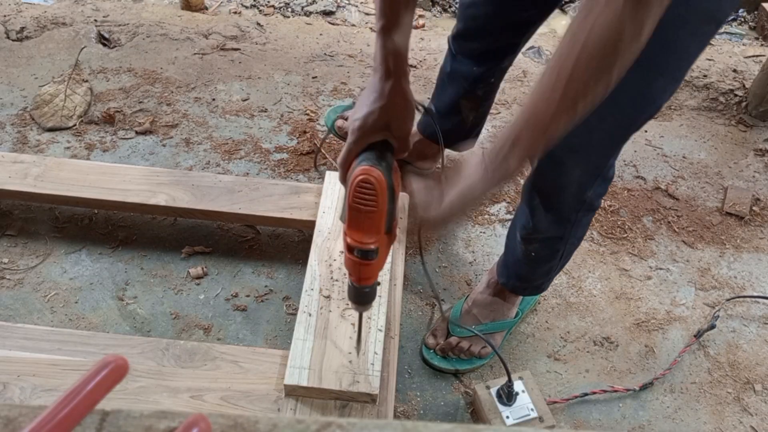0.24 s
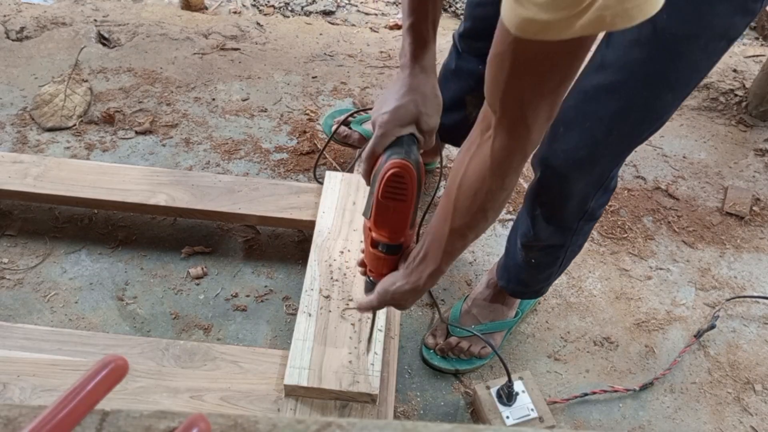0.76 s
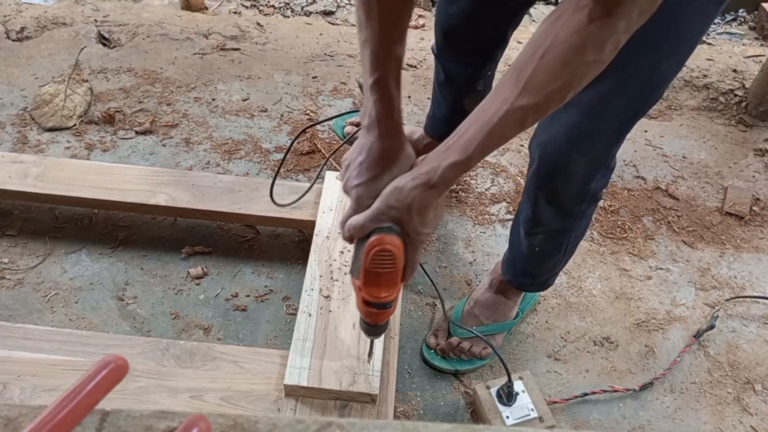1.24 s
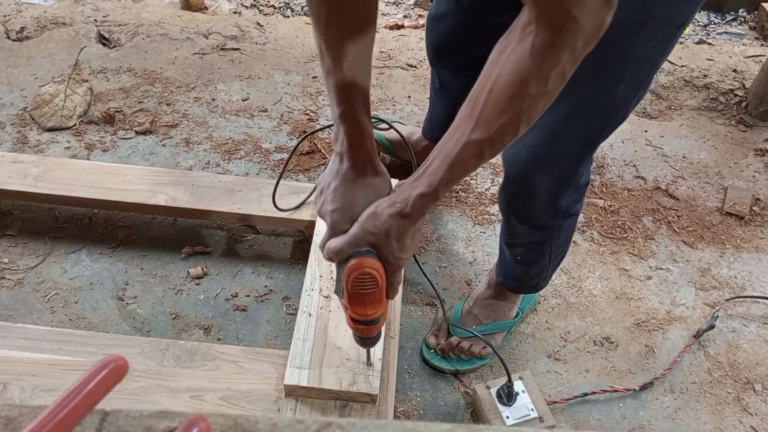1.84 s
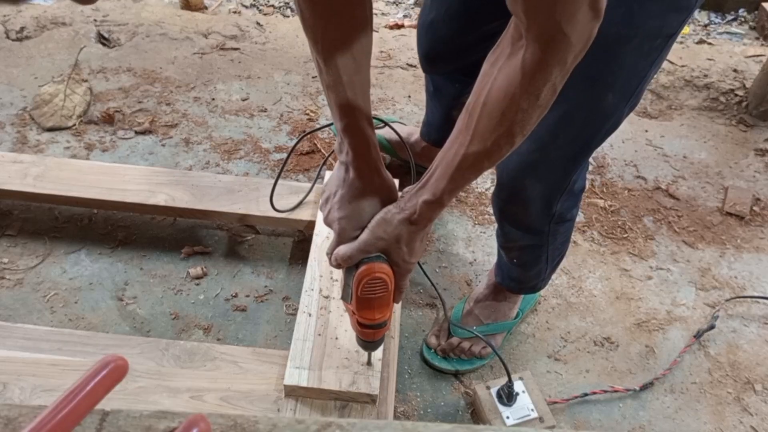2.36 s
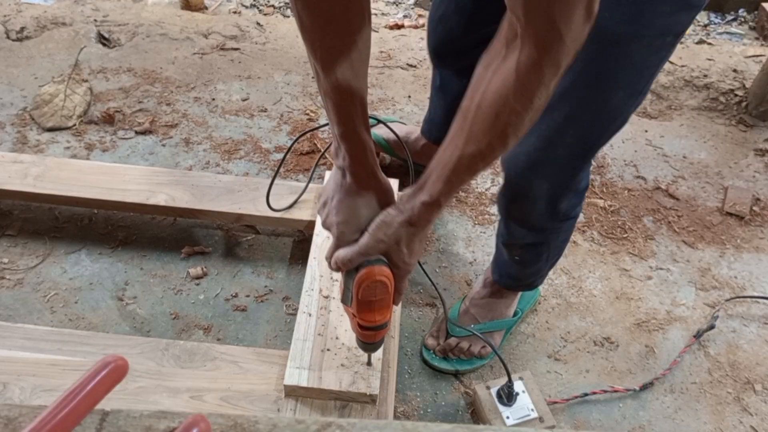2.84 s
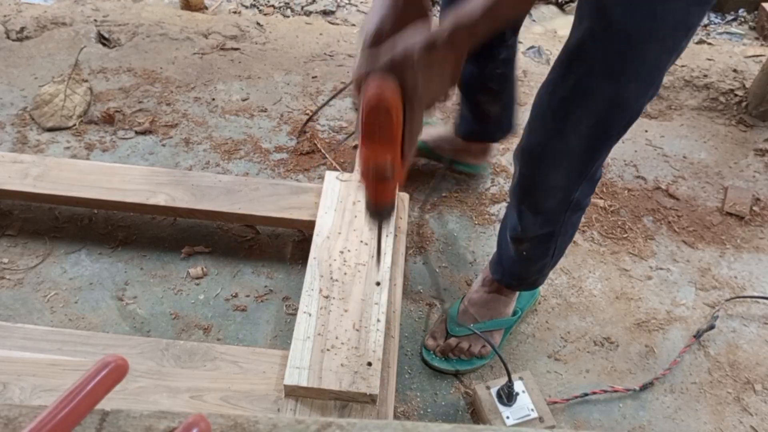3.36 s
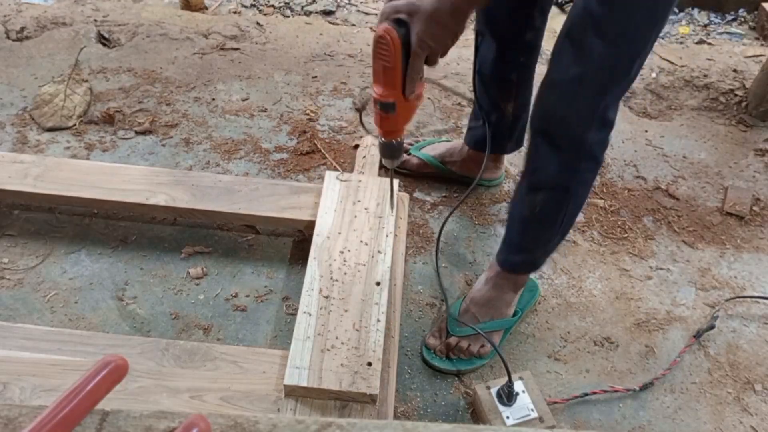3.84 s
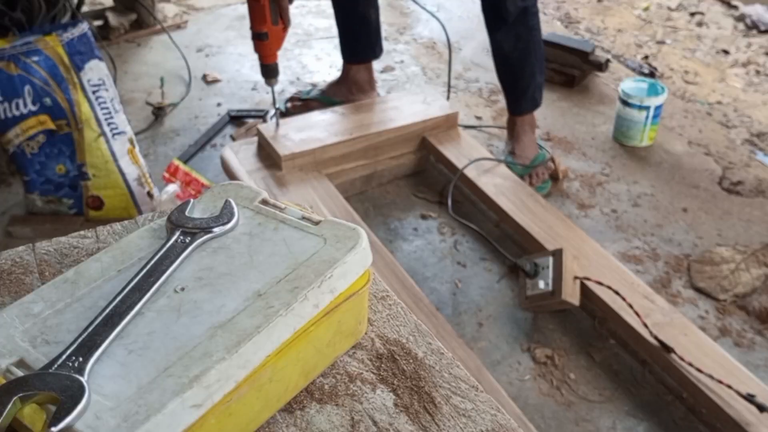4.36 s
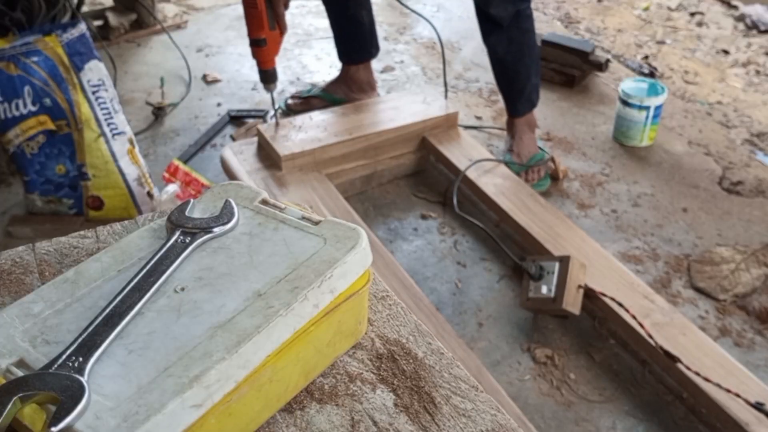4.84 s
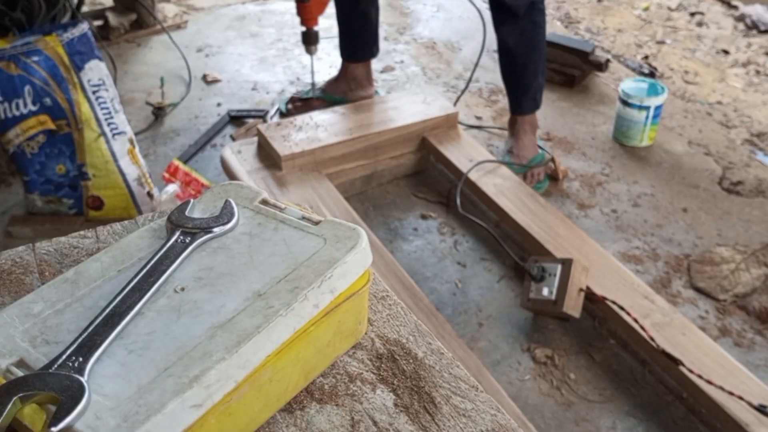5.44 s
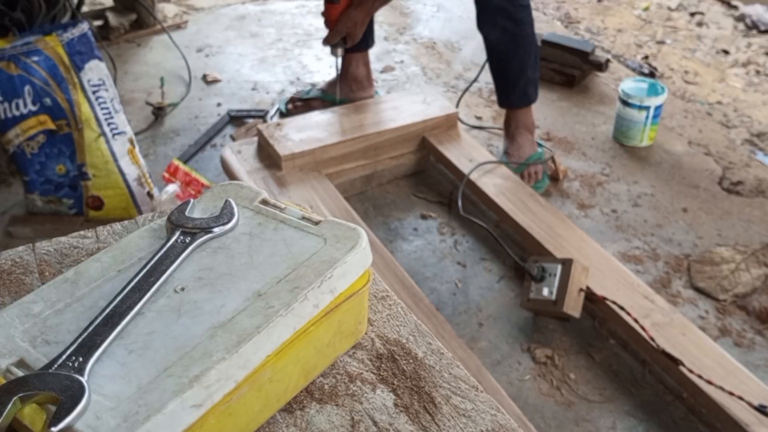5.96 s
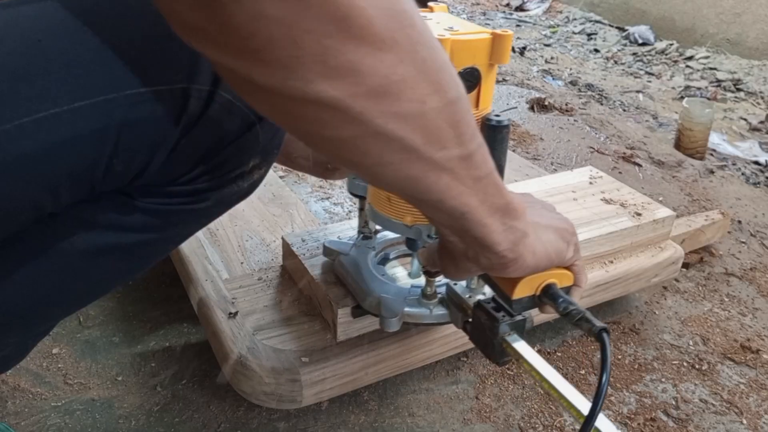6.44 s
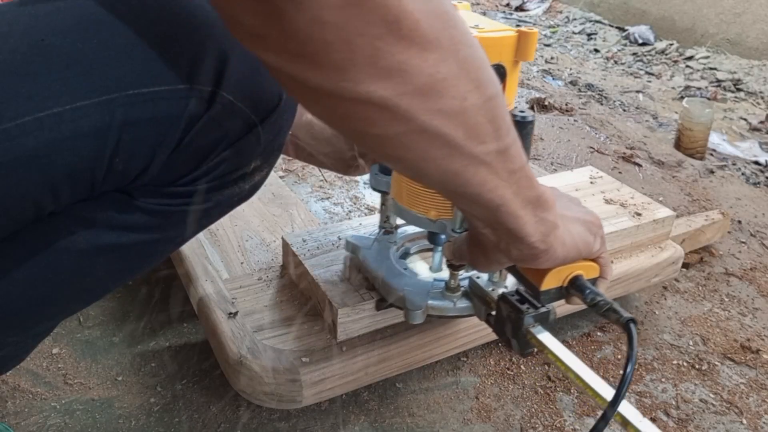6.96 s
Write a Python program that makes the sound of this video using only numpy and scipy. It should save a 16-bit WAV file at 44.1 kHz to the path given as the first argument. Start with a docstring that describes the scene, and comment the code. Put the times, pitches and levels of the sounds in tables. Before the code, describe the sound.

Close, nearly dry workshop sounds over faint yard hiss: a freewheeling drill winding down, a quiet gap, then a sudden gear knock and grinding whine as the bit sinks into wood, its pitch drooping under load before it spins free. Another clicky start and quicker bore follow from a slightly different position. Abruptly, a far louder plunge router takes over, a dense bright roar with low hum and thin high whistles to the end.

```python
"""A mains hand drill in an open workshop, then a plunge router: four short scenes that follow abruptly.
The drill coasts down; twice it starts, bores into a board, races as the bit comes free and coasts again.
Its whine, bearing tones, commutator whistle and noise-like rush all follow one armature speed.
Last, the router cuts a slot: shaft harmonics and fan whistles over noise modulated by the cutter."""
import sys
import numpy as np
from scipy import signal
from scipy.fft import rfft, irfft
from scipy.io import wavfile
from scipy.ndimage import uniform_filter1d

SR = 44100
rng = np.random.default_rng(int(sys.argv[2]) if len(sys.argv) > 2 else 0)


def generate_wav(signal):
    """Clip the signal to [-1, 1] and save it as 16-bit WAV at the path in sys.argv[1]."""
    frames = np.transpose(np.atleast_2d(signal))
    scaled = np.clip(frames, -1, 1) * 32767
    pcm = np.round(scaled).astype(np.int16)
    wavfile.write(sys.argv[1], SR, pcm)


N = 317520
TIME = np.arange(N) / SR
HZ = np.maximum(np.arange(N // 2 + 1) * SR / N, 1)

# where one scene gives way to the next (s); the level dips between the second and third
FIRST_END, SECOND_END, THIRD_START, ROUTER_START = 1.039, 3.951, 3.973, 6.183
DROPOUT_DB = -27
CUTOFF_HZ = 15780

# yard hiss: frequency_hz, density_db
YARD_SPECTRUM = [(35, -66), (60, -44), (103, -35), (152, -35), (255, -28.5), (456, -21), (632, -0.5),
                 (799, 0.5), (1370, -3.5), (2230, -2.5), (3810, -8), (15800, -26.5)]
YARD_DB = -63.5

# freewheeling: start_s, top_turns_per_s, decay_rate_per_s, rush_db, dying_turns_per_s
COASTS = [(0, 630, 0.47, -43, 360), (3.351, 672, 0.62, -42.5, 470), (5.349, 684, 1.44, -42, 400)]
# the slow fan's rush drops by this much over this loss of speed
DYING_DB, DYING_TURNS_PER_S = 7.5, 92.5
# trigger pulls: start_s, rise_s, rush_db, fading_db_per_s as the bit sinks, knock_db, knock_t60_s
STARTS = [(1.495, 0.084, -41, 2, -38, .36), (4.4, .058, -41, 4, -39, 0.19)]
# armature speed in the wood, sagging as the hand leans harder: time_s, speed_turns_per_s
FIRST_HOLE_SPEED = [(1.62, 410), (1.638, 420), (1.702, 470), (1.754, 537), (1.868, 563), (2.082, 561),
                    (2.256, 524), (2.474, 499.4), (2.592, 474), (2.71, 457.1), (3.04, 467.2)]
SECOND_HOLE_SPEED = [(4.48, 446.5), (4.52, 532), (4.56, 572.1), (4.61, 594.5), (4.65, 597.7),
                     (4.868, 563.3), (5.058, 530.6), (5.12, 488), (5.16, 501.1)]
# the inrush of current makes the brushes spark louder at each start
INRUSH_DB, INRUSH_S = 3, 0.049
# load of the bit (share 0-1), time it takes to come free, exponent of the race to top speed
BORING_LOAD, FREEING_S, RACE_EASE = 0.9, 0.059, 1.5
# the current dies down shortly before top speed
CURRENT_FALL_S, CURRENT_LEAD_S = 0.14, 0.042

# rush while boring, coasting and turning slowly: frequency_hz, density_db
BORING_SPECTRUM = [(30, -44), (70, -25), (110, -15.5), (200, -18.5), (330, -12), (520, -4.5), (800, 0.5),
                   (1200, -0.5), (2400, 3.5), (4300, 3), (6800, -1.5), (8200, -18.5), (13500, -26),
                   (15800, -29)]
COASTING_SPECTRUM = [(40, -58), (120, -64), (200, -33.5), (320, -15.5), (520, -10.5), (800, -4.5),
                     (1250, -2), (1800, -2.5), (2600, -2), (4200, -2), (5500, -5.5), (6900, -5),
                     (8000, -17.5), (11000, -25), (13600, -29), (15800, -28)]
IDLING_SPECTRUM = [(59, -76), (100, -63), (219, -43), (342, -21), (413, -25), (500, -18), (618, -24),
                   (849, -7.5), (1750, -10), (2110, -6), (5030, -18), (6920, -18), (15800, -33)]
# resonances of the drill's housing: centre_hz, width_hz, height_db
HOUSING_MODES = [(768, 46, 3.5), (1440, 990, 1.57), (2230, 260, 3.5), (2880, 220, 2), (3730, 170, 2),
                 (6040, 140, 2.5), (6660, 130, 2), (9040, 540, 2), (13400, 700, 3.5)]
# treble against the rush at the usual speed, and its gain per tenfold speed
USUAL_TURNS_PER_S = 550
BORING_TREBLE_DB, COASTING_TREBLE_DB, TREBLE_PER_DECADE_DB = -11.5, -6.5, 13
# second hole heard from another spot: frequency_hz, gain_db
OTHER_SPOT = [(60, -12), (130, 1.5), (250, -4), (500, -2), (1000, -0.5), (3500, -1.5), (5200, -2.5),
              (9000, -1), (11500, -2.5), (15800, -7)]
# vents that face that spot: centre_hz, width_hz, height_db
VENT_MODES = [(3380, 120, 2), (6200, 270, 1.2), (6820, 260, 3.2), (13400, 720, 3.3)]

# ball bearing tones before the housing colours them: ball_pass_multiple, level_db against the rush
BEARING_TONES = [(1, -12), (2, -11.5), (3, -13), (4, -17), (5, -29), (6, -28), (7, -25)]
BALLS_PER_TURN = 2.4
# commutator whistle against the rush at the usual speed, and its gain per tenfold speed
WHISTLE_DB, WHISTLE_PER_DECADE_DB = -20, 35

# scuffs and clicks: start_s, level_db, centre_hz, t60_s
HANDLING = [(1.115, -59, 1200, 0.2), (1.446, -53, 2920, 0.19), (1.448, -55, 750, 0.68),
            (4.088, -49.5, 3380, 0.16), (4.205, -55, 2500, .03), (4.395, -47, 2596, 0.04),
            (4.408, -41, 801, 0.027), (4.417, -37, 1500, 0.031)]
# knock of the gears: frequency_hz, density_db
KNOCK_SPECTRUM = [(50, -38), (130, -18), (300, -5.5), (560, -1), (780, 9), (960, -3), (1200, -3),
                  (2500, -2), (8000, -45)]
KNOCK_PEAK = 0.84  # peak position, as a share of the rise

# low whine orders away from any resonance: frequency_hz, gain_db
WHINE_GAIN = [(400, -54.5), (500, -53.5), (1100, -52.5), (1700, -54), (2400, -53)]
# workpiece resonances that the orders sweep through: centre_hz, width_hz, height_db
FIRST_PIECE_MODES = [(463.3, 16, 9.5), (911, 156, 11), (1400, 66, 6), (1595, 70, 10), (1680, 53, 5.5),
                     (1846, 21, 14), (2160, 130, 12)]
SECOND_PIECE_MODES = [(549.5, 40.3, 4.4), (984, 157, 12.8), (1149, 103, 9.5), (1624, 86, 8.4),
                      (1767, 46, 8), (2000, 50, 12.7), (2295, 240, 9.3)]
# upper whine orders before the housing colours them: order, level_db against the rush
OVERTONES = [(5, -12.5), (6, -15), (7, -12.5), (8, -13), (9, -13), (10, -14), (11, -12.5), (12, -13.5),
             (13, -12.5), (14, -16), (15, -13.5), (16, -17)]
SECOND_OVERTONES_DB = 2.0  # the upper orders carry better in the second hole
# onset of the whine; gain left once the bit is free
WHINE_ATTACK_S, FREE_WHINE_DB = 0.091, -12.5
# the armature rattles in its play until up to speed: phase jitter (turns), settling speed
SPIN_UP_JITTER, SETTLED_TURNS_PER_S = 0.06, 450

# router shaft sagging in the cut: time_s, speed_turns_per_s
ROUTER_SPEED = [(6.19, 336.3), (6.5, 331), (6.7, 328.9), (6.9, 328.2), (7.1, 326.6), (7.2, 324.3)]
# its hum: time_s, second_harmonic_db, third_harmonic_db
HUM_LEVELS = [(6.2, -37, -42), (6.234, -35, -39), (6.324, -42, -48), (6.418, -37, -44), (6.456, -43, -43),
              (6.934, -47.5, -41.5), (7.18, -35.5, -34.5)]
ROUTER_FIRST_DB, ROUTER_FOURTH_DB, HUM_WAVER_DB = -41.5, -41, 1.2
# router fan and commutator tones: order, level_db
ROUTER_TONES = [(15.8, -47), (16, -43.5), (32, -56), (37, -43.5)]
# the router's cut: time_s, level_db, treble_db against the level
CUT_LEVELS = [(6.195, -27.5, -9), (6.203, -28.5, -8), (6.301, -27.5, -8.5), (6.617, -30, -8),
              (6.731, -27.5, -9), (6.783, -30.5, -7.5), (7.135, -29, -7.5), (7.19, -30.5, -7.5)]
# roar of the cutter: frequency_hz, density_db
CUTTING_SPECTRUM = [(30, -54), (60, -36), (110, -20), (200, -18), (400, -11), (700, -3.5), (1100, -5.5),
                    (1650, -1), (2400, -3), (3100, 0.5), (4500, -7.5), (6500, -7.5), (8000, -11),
                    (9500, -9), (11500, -16.5), (15800, -22.5)]
# resonances of the router and of the board: centre_hz, width_hz, height_db
ROUTER_MODES = [(1540, 30, 4), (1825, 35, 4), (2008, 35, 4), (2288, 35, 4), (2614, 25, 3), (2707, 40, 5),
                (3009, 35, 4), (3133, 45, 4), (3741, 25, 6), (4130, 200, 3), (5220, 140, 4), (6400, 250, 3),
                (10600, 200, 3), (13300, 700, 3)]
BOARD_MODES = [(230, 10, 10.5), (480, 12, 5.1), (565, 7.2, 6.5), (720, 25, 2.7), (766, 23, 5.1),
               (892, 120, 5.3)]
# stereo spread of the roar: frequency_hz, side_gain_db
SIDE_GAIN = [(40, -45), (400, -67), (3500, -70), (4700, -38), (5600, -20), (8000, -15), (10500, -11),
             (13000, -5), (15800, -4)]


def from_db(db):
    """Logarithmic level: decibels to amplitude gain."""
    return 10 ** (np.asarray(db) / 20)


def rms_one(x):
    """Normalization to unit rms."""
    return x / np.sqrt(np.mean(x ** 2) + 1e-20)


def in_time(rows):
    """Linear interpolation: each column of a curve at every sample."""
    s, *columns = np.transpose(rows)
    return [np.interp(TIME, s, c) for c in columns]


def between(start, end, fade=0.002):
    """Gating: 1 from start to end, with short ramps."""
    return np.clip((TIME - start) / fade, 0, 1) * np.clip((end - TIME) / fade, 0, 1)


def ramp(start, length):
    """Linear rise from 0 at start to 1 after length seconds."""
    return np.clip((TIME - start) / length, 0, 1)


def colour(points, resonances=()):
    """Resonance: a broad spectrum with bell-shaped peaks added in decibels."""
    hz, db = np.transpose(points)
    db = np.interp(np.log(HZ), np.log(hz), db)
    for centre, width, height in resonances:
        db = db + height / (1 + (2 * (HZ - centre) / width) ** 2)
    return from_db(db)


def filtered(x, gain):
    """Linear filtering: each frequency is scaled by its gain."""
    return irfft(rfft(x) * gain, N)


def noise(gain):
    """Random excitation: noise of the given colour, rms 1."""
    return rms_one(filtered(rng.standard_normal(N), gain))


def drift(rate):
    """Random modulation: low-passed noise up to about rate in Hz, rms 1."""
    return noise(1 / (1 + (HZ / rate) ** 2))


def rush(gain, level_db, treble_db):
    """Broadband turbulence: noise whose presence band and treble each follow a level."""
    band = (HZ > 2500) & (HZ < 7500)
    presence = np.sqrt(np.sum(gain[band] ** 2) / np.sum(gain ** 2))
    upper = 1 / (1 + (7800 / HZ) ** 24)
    body = noise(gain * np.sqrt(1 - upper)) / presence
    treble = noise(gain * np.sqrt(upper))
    return from_db(level_db) * (body + from_db(treble_db) * treble)


def tone(turns, order):
    """Periodic excitation: a line at a multiple of the shaft rate, rms 1."""
    return np.sqrt(2) * np.sin(2 * np.pi * (order * turns + rng.random()))


def reflections(x, wet_db, t60):
    """Reverberation: floor, boards and walls scatter a short decaying tail."""
    t = TIME[:SR // 3]
    tail = rng.standard_normal(len(t)) * from_db(-60 * t / t60) * (t > 0.003)
    tail = tail / np.linalg.norm(tail)
    wet = from_db(wet_db)
    return (x + wet * signal.fftconvolve(x, tail)[:N]) / np.sqrt(1 + wet ** 2)


def yard_hiss():
    """Stationary background: faint coloured noise with a slowly wandering level."""
    return from_db(YARD_DB + 0.59 * drift(5.4)) * noise(colour(YARD_SPECTRUM))


def run_down(coast):
    """Exponential decay: friction slows the shaft in proportion to its speed."""
    start, top, rate = coast[:3]
    return top * np.exp(-rate * np.maximum(TIME - start, 0))


def coasting_rush(coast, speed):
    """Fan noise of a freewheeling rotor, in dB: steady until it turns too slowly."""
    *_, db, dying_speed = coast
    return db - DYING_DB * np.clip((dying_speed - speed) / DYING_TURNS_PER_S, 0, 1)


def one_run(start, hole, coast):
    """Drive against load: spin up, bore, race free, coast; gives speed, power, load and rush in dB."""
    s, rise, db, fading = start[:4]
    free, free_speed = hole[-1]
    let_go, top = coast[:2]
    bore, = in_time([(s, 30), *hole])
    race = (top - free_speed) * (1 - (1 - ramp(free, let_go - free)) ** RACE_EASE)
    speed = np.where(TIME < let_go, bore + race, run_down(coast))
    power = 1 - ramp(let_go - CURRENT_LEAD_S - CURRENT_FALL_S, CURRENT_FALL_S)
    load = BORING_LOAD * (1 - ramp(free, FREEING_S))
    age = np.maximum(TIME - s - rise, 0)
    inrush_db = INRUSH_DB * np.exp(-age / INRUSH_S)
    rise_db = 26 * np.log10(np.maximum(ramp(s, rise), 0.12))
    driven_db = db - fading * age + inrush_db + rise_db
    rush_db = power * driven_db + (1 - power) * coasting_rush(coast, speed)
    return np.array([speed, power, load, rush_db])


def motor():
    """Rotor dynamics: the drill first coasts; each pull of the trigger belongs to a new run."""
    speed = run_down(COASTS[0])
    state = np.array([speed, np.zeros(N), np.zeros(N), coasting_rush(COASTS[0], speed)])
    holes = (FIRST_HOLE_SPEED, SECOND_HOLE_SPEED)
    for scene_start, start, hole, coast in zip((FIRST_END, THIRD_START), STARTS, holes, COASTS[1:]):
        state = np.where(TIME > scene_start, one_run(start, hole, coast), state)
    return state


def coasting_noise(speed, rush_db, treble_db):
    """Fan turbulence that darkens with falling speed, modulated by rattling unloaded gears."""
    slow = np.clip((360 - speed) / 50, 0, 1)
    fast_fan = rush(colour(COASTING_SPECTRUM, HOUSING_MODES), rush_db - 1, treble_db)
    slow_fan = rush(colour(IDLING_SPECTRUM), rush_db - 3, treble_db)
    fan = np.sqrt(1 - slow) * fast_fan + np.sqrt(slow) * slow_fan
    # the gears' flutter grows as they slow
    flutter = 0.021 + 0.045 * np.clip((520 - speed) / 80, 0, 1)
    return fan * from_db(0.76 * drift(70)) * (1 + flutter * tone(TIME + 0.0037 * drift(4), 25))


def bearing(turns, speed, load, power):
    """Ball-pass excitation: balls skid more once the armature coasts; the housing radiates the ticking."""
    skid = 0.035 * drift(22) + 0.14 * (1 - power) * np.clip((speed - 300) / 200, 0, 1) * drift(20)
    ticking_db = 4 * np.clip((500 - speed) / 100, 0, 1)  # slow balls tick more sharply
    free = 0
    for k, db in BEARING_TONES:
        slip = (0.12 + 0.11 * (1 - power)) * drift(32) / k
        level_db = db + ticking_db * np.clip(k - 2, -0.5, 1) + 3.95 * drift(13)
        free = free + from_db(level_db) * tone(BALLS_PER_TURN * turns + skid + slip, round(k))
    loaded = from_db(-11.5) * tone(turns + skid, 2.41) + from_db(-26.0) * tone(turns + skid, 3.41)
    ticking = (1 - load) * from_db(5.9 * power) * free + load * loaded
    return filtered(ticking, colour(COASTING_SPECTRUM, HOUSING_MODES))


def commutator_whistle(turns, speed, power):
    """Segment-rate excitation: a line 24 times a turn as the power fades, louder at speed."""
    speed_db = WHISTLE_PER_DECADE_DB * np.log10(speed / USUAL_TURNS_PER_S)
    level = from_db(WHISTLE_DB + speed_db + 3.5 * drift(12))
    return (1 - power) * level * tone(turns + 0.011 * drift(60), 24)


def handling():
    """Impact and friction: band-passed bursts decay as scuffs and clicks of the bit and trigger."""
    out = 0
    for s, db, hz, t60 in HANDLING:
        band = 1 / (1 + (HZ / hz - hz / HZ) ** 2)
        decay_db = db - 60 * np.maximum(TIME - s, 0) / t60
        out = out + noise(band) * between(s, s + 1) * from_db(decay_db)
    return out


def gear_knock():
    """Backlash: a burst of noise as the gears take up their play when the motor kicks in."""
    swell = 0
    for s, rise, _, _, db, t60 in STARTS:
        to_peak = KNOCK_PEAK * rise
        decay_db = db - 60 * np.maximum(TIME - s - to_peak, 0) / t60
        swell = swell + ramp(s, to_peak) ** 2 * from_db(decay_db)
    return swell * from_db(1.5 * drift(90)) * noise(colour(KNOCK_SPECTRUM))


def boring_noise(rush_db, treble_db):
    """Fracture and sparking: noise torn unevenly by the fibres, swelling twice per mains cycle."""
    tearing = rush(colour(BORING_SPECTRUM, HOUSING_MODES), rush_db - 3.5, treble_db + 4.5)
    return tearing * (1 + 0.067 * tone(TIME, 100)) * from_db(1.4 * drift(90))


def drill_whine(turns, speed, power, rush_db):
    """Order excitation: the loaded armature makes contact once a turn; gear play smears upper orders."""
    spindle = turns / 8.7 + 0.11 * drift(13)  # geared down
    rattle = SPIN_UP_JITTER * np.clip((SETTLED_TURNS_PER_S - speed) / 50, 0, 1)
    shaken = turns + (0.014 + rattle) * drift(55.6) + 0.008 * tone(spindle, 0.99)
    upper = 0
    for order, db in OVERTONES:
        level = from_db(db + rush_db + 2.53 * drift(20.0))
        upper = upper + level * tone(shaken + 0.13 * drift(37) / order, round(order))
    upper = reflections(filtered(upper, colour(BORING_SPECTRUM, HOUSING_MODES)), wet_db=-3.0, t60=0.21)
    upper = upper * np.clip(speed / 460, 0, 1) ** 3
    flutter_db = 1 + 2.0 * np.clip(np.abs(speed - 460) / 100, 0, 1)  # steadiest near 460 turns per s
    lower = sum(from_db(flutter_db * drift(25)) * tone(shaken, k + 1) for k in range(4))
    out = 0
    for hole, piece, upper_db, end in (
            (FIRST_HOLE_SPEED, FIRST_PIECE_MODES, 0, SECOND_END),
            (SECOND_HOLE_SPEED, SECOND_PIECE_MODES, SECOND_OVERTONES_DB, ROUTER_START)):
        onset = ramp(hole[0][0] - WHINE_ATTACK_S, WHINE_ATTACK_S)
        contact = onset * from_db(FREE_WHINE_DB * ramp(hole[-1][0], FREEING_S))
        orders = filtered(lower, colour(WHINE_GAIN, piece)) + from_db(upper_db) * upper
        out = out + orders * contact * power * (TIME < end)
    return out


def drill():
    """Common drive: one armature speed governs every tone and noise of the drill."""
    speed, power, load, rush_db = motor()
    speed = uniform_filter1d(speed, size=SR // 40, mode="nearest")  # inertia
    turns = np.cumsum(speed) / SR
    treble_db = power * BORING_TREBLE_DB + (1 - power) * COASTING_TREBLE_DB
    treble_db = treble_db + TREBLE_PER_DECADE_DB * np.log10(speed / USUAL_TURNS_PER_S)
    tones = bearing(turns, speed, load, power) + commutator_whistle(turns, speed, power)
    tones = from_db(rush_db) * tones * np.clip(speed / 340, 0, 1) ** 3  # weak at low speed
    sound = drill_whine(turns, speed, power, rush_db) + reflections(tones, wet_db=1.0, t60=0.059)
    sound = sound + np.sqrt(power) * boring_noise(rush_db, treble_db)
    sound = sound + np.sqrt(1 - power) * coasting_noise(speed, rush_db, treble_db) + gear_knock()
    first_spot = between(-1, FIRST_END) + between(1.47, SECOND_END)
    other_spot = filtered(sound, colour(OTHER_SPOT, VENT_MODES)) * between(4.407, ROUTER_START)
    return sound * first_spot + other_spot


def router():
    """Harmonic and broadband radiation: hum and whistles over a roar, bitten about once a turn."""
    speed, = in_time(ROUTER_SPEED)
    second_db, third_db = in_time(HUM_LEVELS)
    cut_db, treble_db = in_time(CUT_LEVELS)
    turns = np.cumsum(speed) / SR
    hum = 0
    for k, db in enumerate((ROUTER_FIRST_DB, second_db, third_db, ROUTER_FOURTH_DB)):
        hum = hum + from_db(db + HUM_WAVER_DB * drift(7.9)) * tone(turns + 0.0053 * drift(25), k + 1)
    whistles = 0
    for order, db in ROUTER_TONES:
        whistles = whistles + from_db(db + 3.2 * drift(6.4)) * tone(turns + 0.0037 * drift(25), order)
    wood = colour(CUTTING_SPECTRUM, [*ROUTER_MODES, *BOARD_MODES])
    bite = (1 + 0.082 * tone(turns, 0.97)) * from_db(0.46 * drift(120))
    # so small a tool radiates almost no bass in its roar
    roar = filtered(rush(wood, cut_db - 0.3, treble_db) * bite, 1 / (1 + (60 / HZ) ** 2))
    mid = hum + whistles + roar
    # mainly the hiss spreads to the sides
    side = filtered(rush(wood, cut_db, treble_db), colour(SIDE_GAIN))
    return (mid + side * [[1], [-1]]) * between(ROUTER_START, 10)


def scene():
    """Superposition: the tools over the yard hiss, with one brief dip in level."""
    mix = drill() + handling() + yard_hiss() + router()
    return mix * from_db(DROPOUT_DB * between(SECOND_END, THIRD_START))


def record(dry):
    """Band limiting: a steep low-pass removes the top."""
    return irfft(rfft(dry) / np.sqrt(1 + (HZ / CUTOFF_HZ) ** 900), N)


dry = scene()
out = record(dry)
generate_wav(out)
```